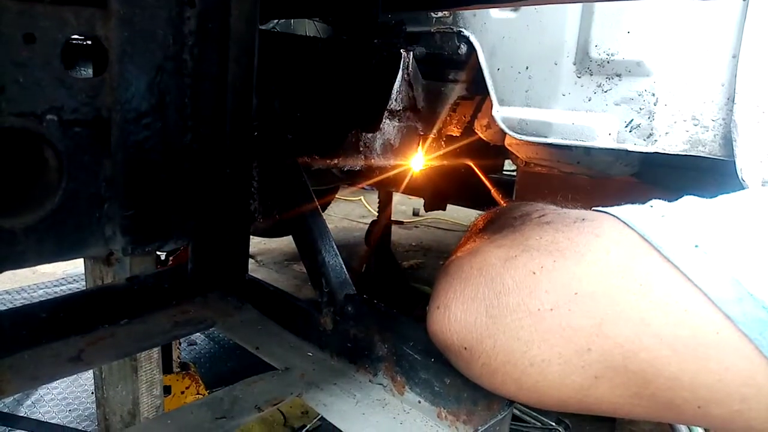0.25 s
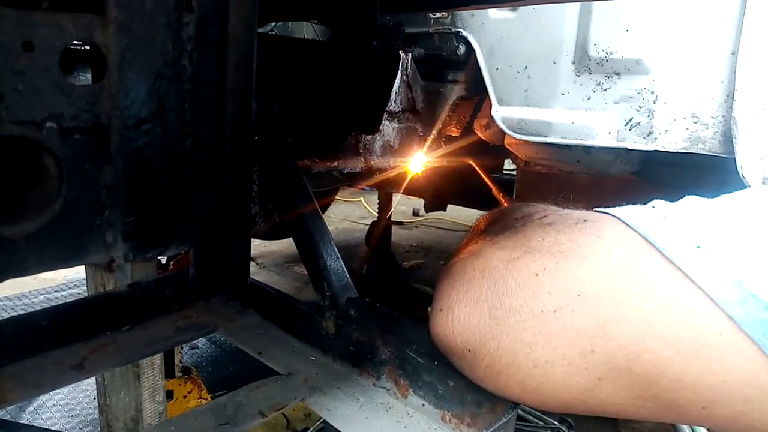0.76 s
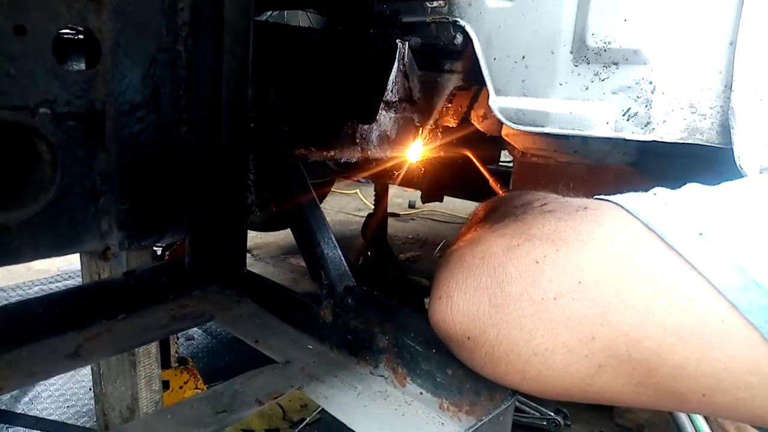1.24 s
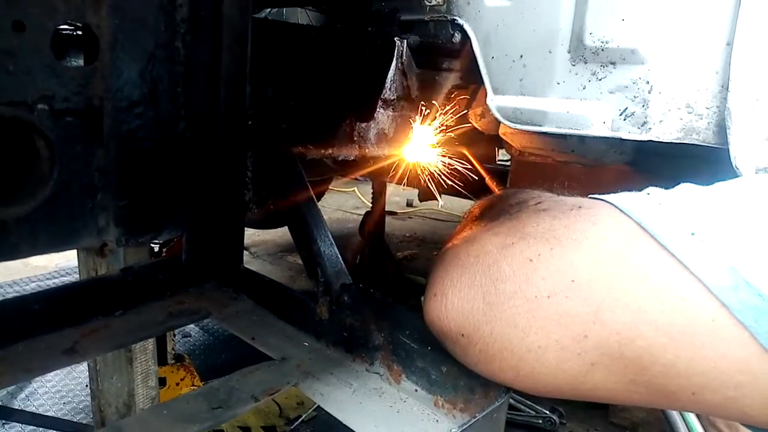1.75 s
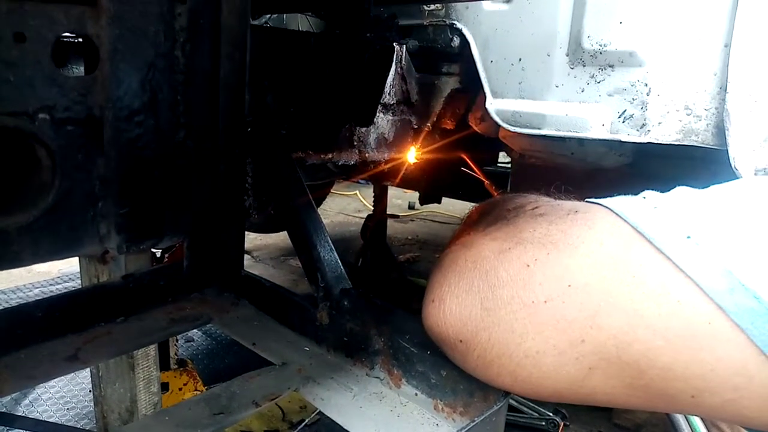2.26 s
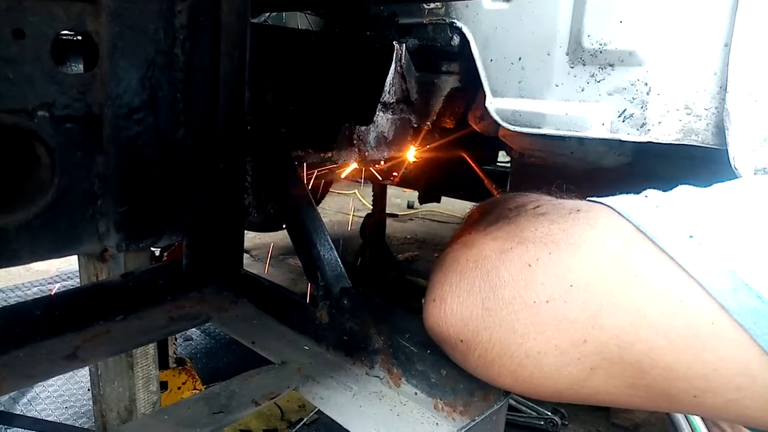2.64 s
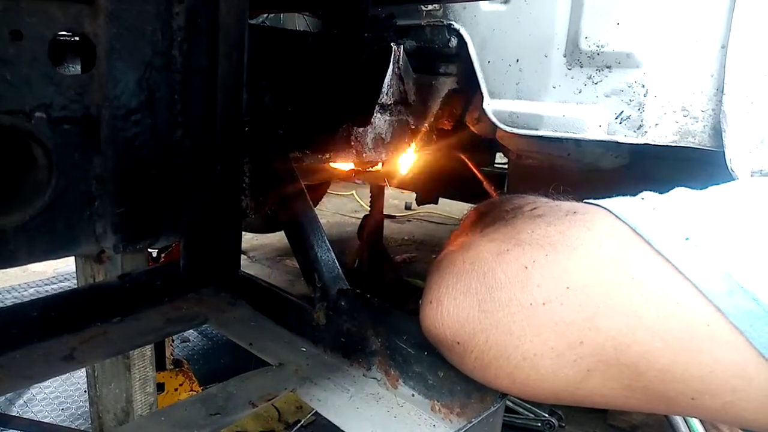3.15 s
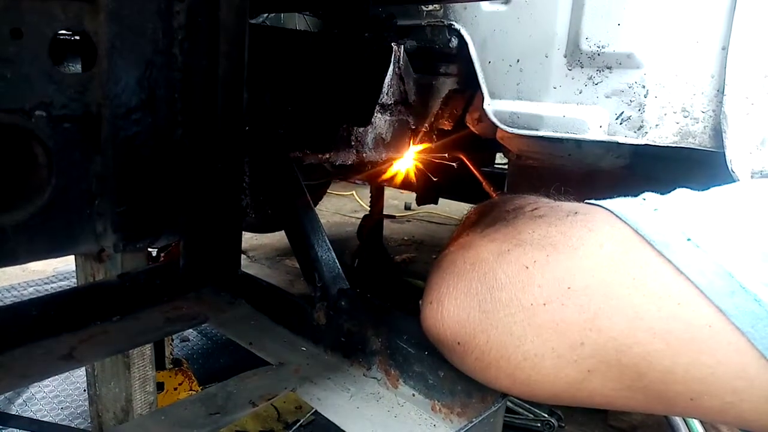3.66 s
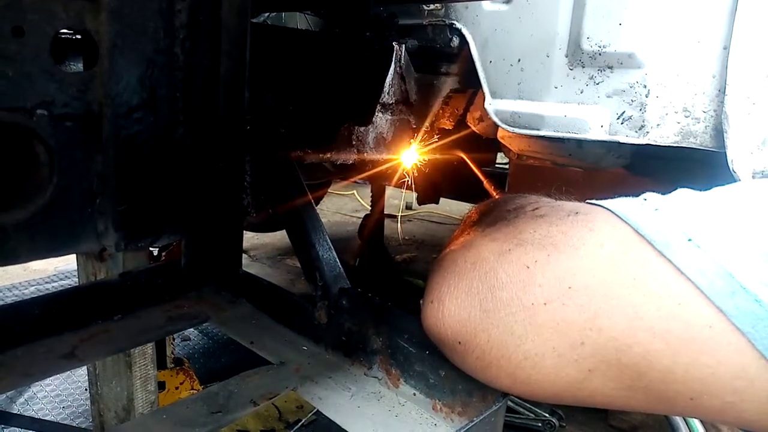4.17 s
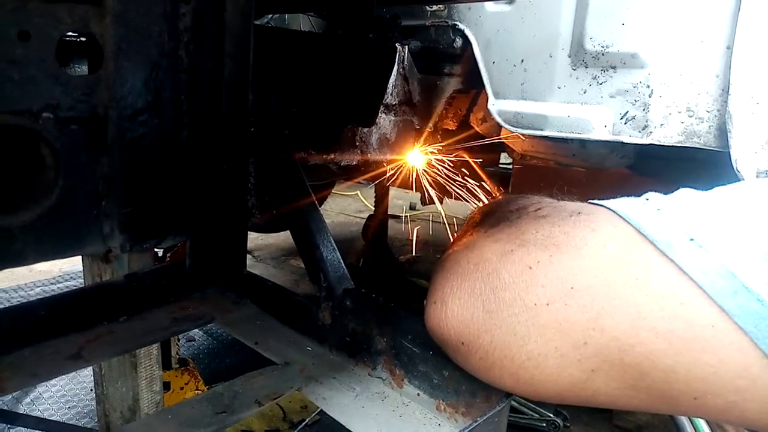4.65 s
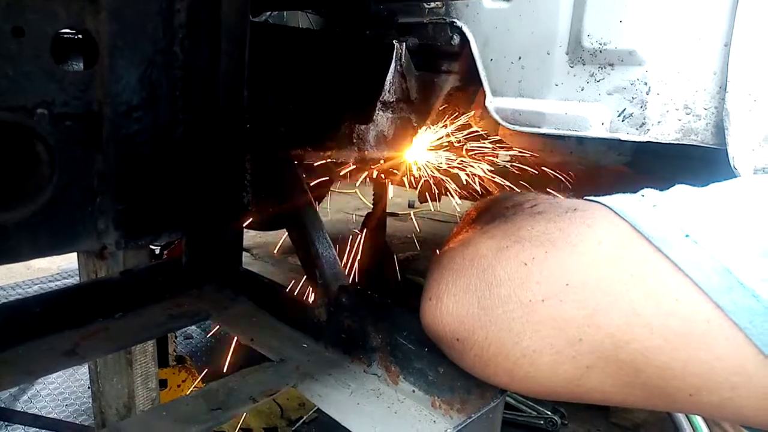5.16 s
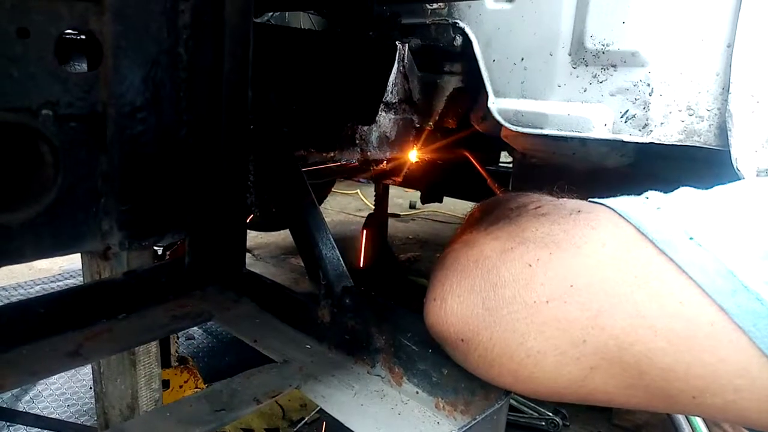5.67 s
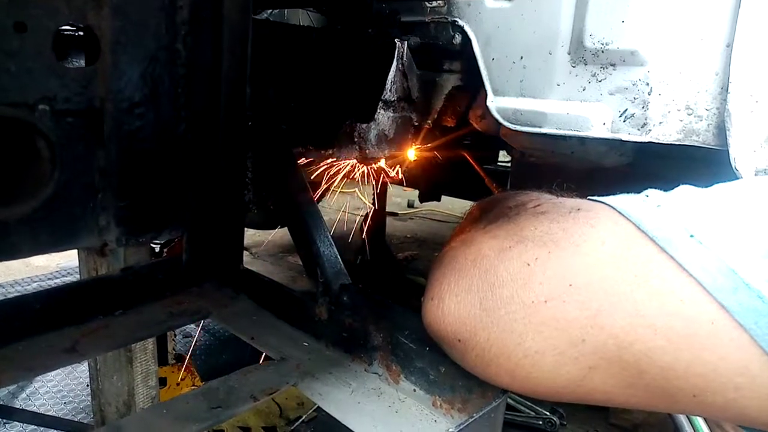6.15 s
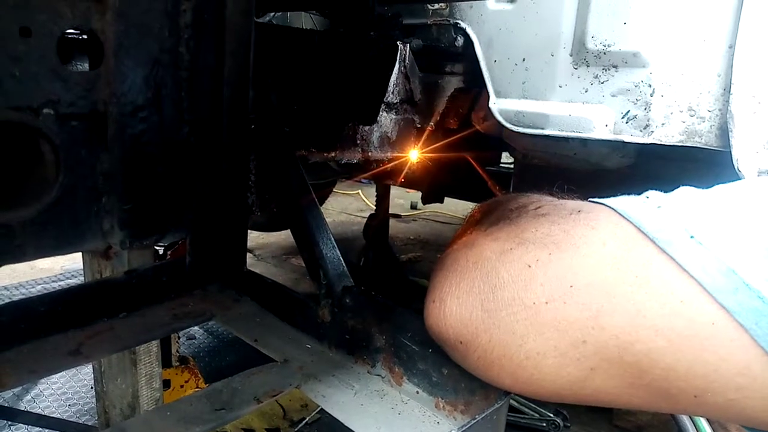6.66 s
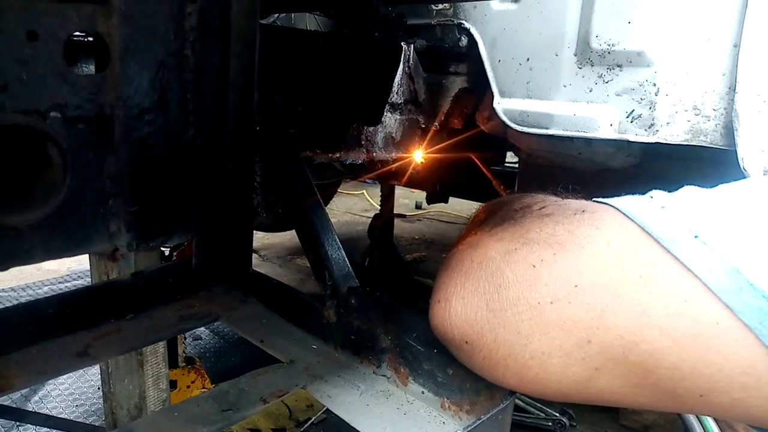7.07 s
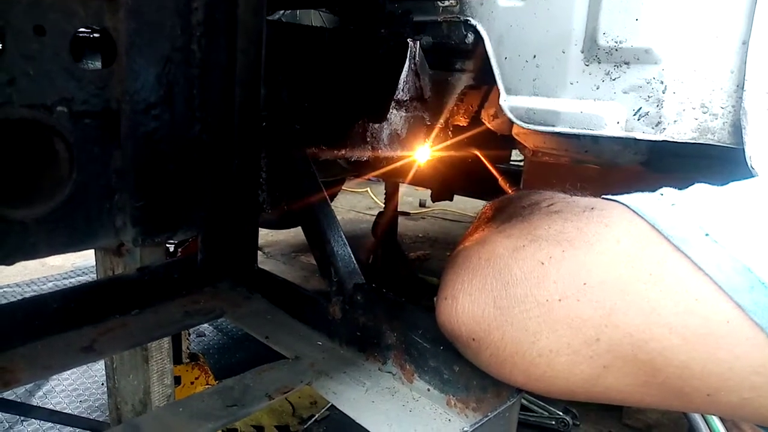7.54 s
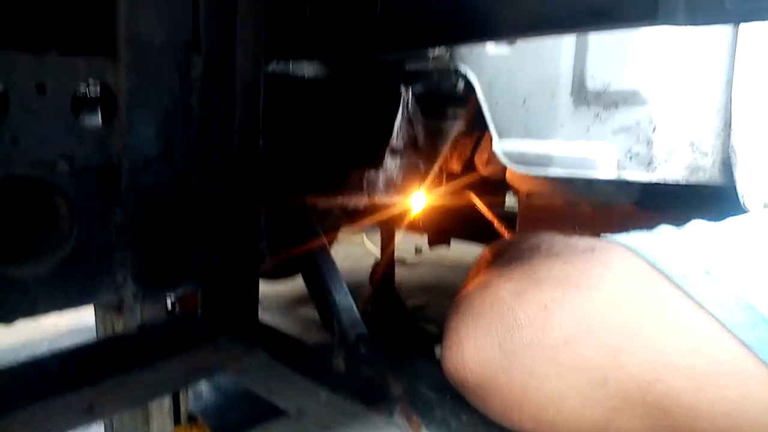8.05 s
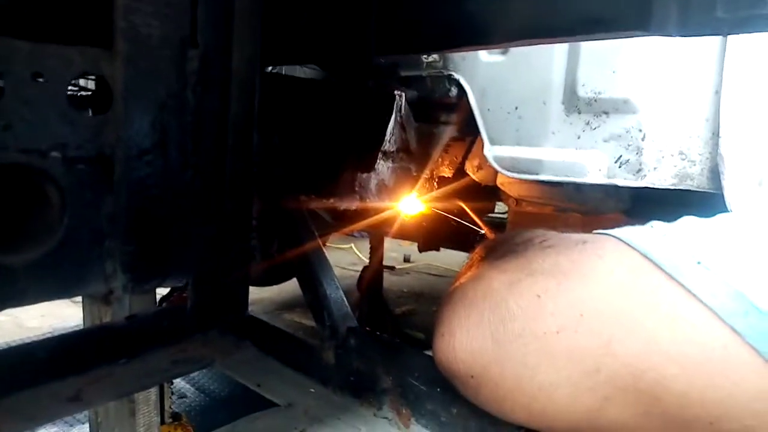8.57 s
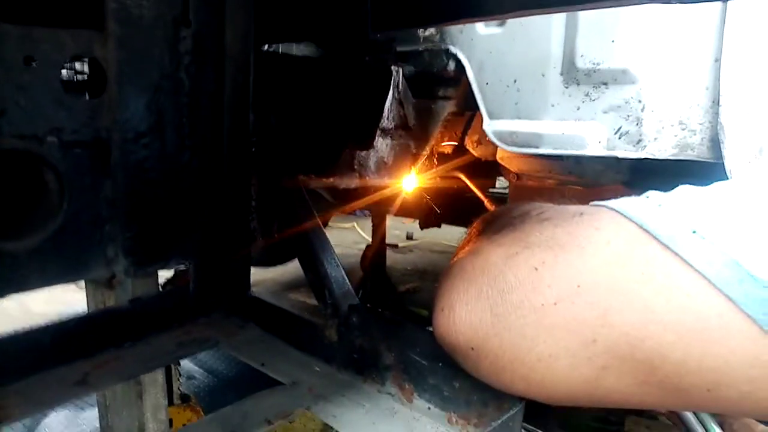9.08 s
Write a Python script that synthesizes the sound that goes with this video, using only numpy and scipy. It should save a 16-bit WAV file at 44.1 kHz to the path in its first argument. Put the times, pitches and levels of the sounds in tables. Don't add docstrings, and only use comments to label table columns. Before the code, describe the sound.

A hand-held stereo microphone near arc welding in a workshop. The arc fries and crackles loudly with sharp pops, breaks up, whistles faintly on restarting, nearly dies, then sizzles steadily with small gaps. It weakens into airy sputters before flaring hard again and stopping. The metal frame adds a tight, ringing colour, puffs of air thud at the microphone, and a low shop rumble fills the gaps.

```python
import sys
import numpy as np
from scipy import signal
from scipy.fft import rfft, irfft, next_fast_len
from scipy.io import wavfile
from scipy.ndimage import uniform_filter1d

SR = 44100
rng = np.random.default_rng(int(sys.argv[2]) if len(sys.argv) > 2 else 0)


def voltage_ratio(level):
    return 10 ** (np.asarray(level, float) / 20)


def transcribe(u):
    v = np.clip(np.atleast_2d(u).T, -1, 1)
    q = np.round(v * 32767).astype(np.int16)
    wavfile.write(sys.argv[1], SR, q)


N = 410571

PORT_LAG = 38
PADDED = next_fast_len(N + SR // 2)
HZ = np.maximum(np.arange(PADDED // 2 + 1) * SR / PADDED, 1)


def rms_one(x):
    return x / np.sqrt(np.mean(np.abs(x) ** 2) + 1e-20)


def in_time(rows):
    s, *columns = np.transpose(rows)
    return [np.interp(np.arange(N) / SR, s, column) for column in columns]


def over_hz(points):
    hz, value = np.transpose(points)
    return np.interp(np.log(HZ), np.log(hz), value)


def drift(rate_hz):
    r = np.exp(-2 * np.pi * rate_hz / SR)
    noise = rng.standard_normal(N + SR)
    return rms_one(signal.lfilter([1], [1, -2 * r, r * r], noise)[SR:])


def below(edge_hz):
    return 1 / (1 + (HZ / edge_hz) ** 10)


def peaks_db(modes):
    return sum(db / (1 + (2 * (HZ - hz) / width) ** 2) for hz, width, db in modes)


def held(t, start, end, rise_db_per_s, fall_db_per_s):
    attack = -rise_db_per_s * np.maximum(start - t, 0)
    return attack - fall_db_per_s * np.maximum(t - end, 0)


def burning():
    # strike in seconds, break in seconds, hiss at strike in dB,
    # hiss at break in dB, sizzle relative to hiss in dB.
    burns = [(0.0, 0.603, -28.5, -25, 3.5), (0.645, 0.737, -41, -62, -6), (0.91, 1.082, -62, -41, -3),
             (1.107, 1.71, -37.5, -35, 2), (1.705, 1.859, -30, -23.5, -1), (1.96, 2.223, -44, -41.5, -2),
             (2.416, 2.658, -40, -36, -4.5), (2.71, 2.773, -28, -31.5, 1), (2.821, 3.055, -42.5, -55, -11),
             (3.359, 3.466, -35.5, -48, -8), (3.712, 3.82, -47, -34, 0), (3.848, 4.494, -32, -31.5, 0.5),
             (4.508, 4.876, -28, -28, -1.5), (4.88, 5.624, -37.5, -36, 0), (5.755, 6.008, -39, -40, 0.5),
             (6.072, 6.282, -32.5, -57, 1.5), (6.682, 6.843, -53, -51, -4), (7.28, 7.495, -48, -39, -4),
             (7.507, 7.74, -39, -40.5, -3.5), (7.749, 7.985, -56, -46.5, 1.5),
             (8.037, 8.216, -38.5, -49.5, -7), (8.273, 8.396, -59, -39.5, -6),
             (8.416, 8.604, -39.5, -44.5, -10), (8.656, 9.311, -29.5, -32, 1)]
    # middle in seconds, hold in seconds, hiss in dB, sizzle relative to hiss in dB, roar in dB.
    flares = [(0.07, 0.016, -41, 10, -68), (0.196, 0.018, -25, -3, -47), (0.417, .01, -24.5, -10, -35.5),
              (0.578, 0.022, -19, -17, -37), (1.758, 0.022, -24.5, -6, -42.5),
              (1.888, 0.013, -28.5, -11, -29.5), (2.276, 0.042, -22.5, -9, -32),
              (2.378, 0.054, -26, -7, -32), (2.521, 0.053, -32, -6, -43.5), (3.147, 0.058, -46.5, -3, -53),
              (3.626, 0.017, -40, -15, -50), (3.834, 0.016, -33.5, 2, -59), (4.178, 0.084, -31.5, -9, -46),
              (4.793, .01, -25.5, 2, -60), (4.852, 0.012, -25, -4, -56), (5.166, 0.059, -31, -12, -43.5),
              (5.673, 0.075, -28, -3, -42.5), (5.82, 0.027, -38, -1, -52), (6.034, 0.038, -28.5, -3, -42.5),
              (6.861, 0.0073, -22, 0, -40.5), (8.61, .01, -32, 0, -50), (9.062, 0.016, -26, -3.5, -51),
              (9.149, 0.074, -24, -22, -41.5), (9.264, 0.053, -25, -9, -37.5),
              (0.7, 0.032, -58, -4, -48), (2.11, 0.067, -50, -9, -42.5), (2.611, 0.061, -39, -5, -40),
                (3.42, 0.045, -39.5, -20, -45), (4.5, 0.46, -52, -6, -44), (7.35, 0.059, -50, 4, -59.5),
                (7.83, 0.018, -48, 4, -65), (7.93, 0.018, -46, -1, -58), (8.19, 0.035, -57, 13, -64),
                (4.88, .01, -45, -5, -47), (7.87, 0.015, -67, -4, -78), (8.05, 0.043, -47, -10, -47),
                (8.33, .02, -56, -1, -60), (8.53, 0.045, -53, -5, -45), (1.65, .03, -54, 0, -48),
                (8.41, .04, -55, -7, -46.5), (8.76, 0.018, -32, -12, -43), (8.97, 0.028, -30.5, 1.5, -43.5)]
    strike_db_per_s, break_db_per_s = 500, 900
    swell_db_per_s, sink_db_per_s = 291, 499
    glow_db, glow_sizzle_db = -57, -4
    middling_db = -35
    roar_db_at_middling, roar_follows = -46, 0.29
    dark_db_at_middling, dark_follows = -1, -0.062

    t = np.arange(0, N / SR + .002, .001)
    hiss = voltage_ratio(2 * glow_db)
    sizzle = voltage_ratio(2 * (glow_db + glow_sizzle_db))
    for start, end, from_db, to_db, sizzle_db in burns:
        level_db = np.interp(t, [start, end], [from_db, to_db])
        power = voltage_ratio(2 * (level_db + held(t, start, end, strike_db_per_s, break_db_per_s)))
        hiss = hiss + power
        sizzle = sizzle + power * voltage_ratio(2 * sizzle_db)
    steady_db = 10 * np.log10(hiss) - middling_db

    roar = voltage_ratio(2 * (roar_db_at_middling + roar_follows * steady_db))
    for s, hold, hiss_db, sizzle_db, roar_db in flares:
        power = voltage_ratio(2 * held(t, s - hold / 2, s + hold / 2, swell_db_per_s, sink_db_per_s))
        hiss = hiss + power * voltage_ratio(2 * hiss_db)
        sizzle = sizzle + power * voltage_ratio(2 * (hiss_db + sizzle_db))
        roar = roar + power * voltage_ratio(2 * roar_db)
    dark_db = dark_db_at_middling + dark_follows * (10 * np.log10(hiss) - middling_db)
    return in_time(np.transpose([t, np.sqrt(hiss), np.sqrt(sizzle / hiss), np.sqrt(roar), dark_db]))


def spits():
    # start in seconds, peak in dB, decay by 60 dB in seconds, share of roar in dB.
    spit_rows = [(1.0884, -23.5, 0.19, -8), (1.717, -2.5, 0.082, -13), (1.867, 0, 0.1, -16.5),
                 (2.235, -8, 0.03, 4), (2.279, -14, 0.075, -16), (2.3414, -20, 0.079, 1),
                 (2.5132, -26, 0.064, -17), (2.696, -3, 0.074, -14), (2.7174, -16, 0.052, -5),
                 (3.7314, -25, .04, -17), (4.96, -37, 0.013, -22), (5.817, -12, 0.032, -21),
                 (7.645, -22, 0.04, -18), (8.5764, -22, .05, -15), (9.0334, -5, 0.037, -14),
                 (5.03, -22, 0.049, -28), (3.6357, -12, 0.039, -21), (4.766, -13, 0.018, -3),
                 (4.836, -8, .04, -19), (5.6273, -14, 0.063, -29), (6.829, -31, 0.14, 5),
                 (7.051, -22, 0.018, -30), (8.0112, -32, 0.097, 2), (8.6466, -6, 0.035, -15),
                 (8.698, -13, 0.036, -16), (8.748, -15, 0.047, -24)]
    t = np.arange(SR // 4) / SR
    hiss, roar = np.zeros(N + SR), np.zeros(N + SR)
    for s, db, t60, roar_db in spit_rows:
        attack = np.clip(t / .0018, 0, 1)
        burst = attack * voltage_ratio(db - 15 - 60 * t / t60)
        near = slice(round(s * SR), round(s * SR) + len(t))
        hiss[near] += burst
        roar[near] += burst * voltage_ratio(roar_db)
    return hiss[:N], roar[:N]


def frame_path(colour, modes, lag, near_t60, near_db, far_t60, far_db):
    t = np.arange(SR // 3) / SR
    echoes = np.zeros(len(t))
    for t60, db in ((near_t60, near_db), (far_t60, far_db)):
        decay = voltage_ratio(-60 * t / t60) / np.sqrt(t60 * SR / 14)
        echoes += voltage_ratio(db) * rng.standard_normal(len(t)) * decay
    echoes[0] = 1
    path = rfft(echoes, PADDED)
    path /= np.sqrt(uniform_filter1d(np.abs(path) ** 2, size=1400))
    modes = [(hz, width, db * (rng.uniform(.2, 1.6) if hz > 3000 else 1)) for hz, width, db in modes]
    delay = np.exp(-2j * np.pi * HZ * lag / SR)
    return path * voltage_ratio(over_hz(colour) + peaks_db(modes)) * delay


def arc(burn, sizzle_share, roar, dark_db):
    # time in seconds, left-right difference of hiss in dB, of sizzle in dB.
    aim = [(0.0, 2, 0), (0.5, 3, -3), (1.53, -0.7, -2), (1.94, 3, 0), (2.72, 1.5, 0.5), (3.06, 4, -1.5),
           (3.37, 1, 3), (3.8, 3, -7.5), (4.2, 1.5, -1.5), (5.75, 3, -0.5), (7.05, 4, -2.5),
           (7.83, 2.5, -2.5), (8.92, 1.5, -13), (9.31, 2.5, -11.5)]
    # frequency in Hz, density in dB per Hz.
    left_colour = [(300, -12.0), (600, -6.3), (1300, -7.5), (2200, -6.7), (3500, -4.6), (4900, -0.3),
                   (6000, 5.4), (7200, 5.8), (8800, 2.0), (10000, -5.8), (11800, -12.6), (13600, -16.5),
                   (14800, -9.9), (15500, -10.9)]
    right_colour = [(300, -9.5), (600, -9.0), (1300, -7.6), (2200, -7.0), (3500, -5.9), (4900, -2.0),
                    (6000, 2.0), (7200, 0.6), (8800, 2.3), (10000, -1.8), (11800, -7.3), (13600, -11.1),
                    (14800, -1.5), (15500, -2.1)]
    # frequency in Hz, width in Hz, height in dB.
    left_modes = [(480, 200, -8), (1240, 110, -6), (680, 50, 5), (1012, 50, 8), (830, 60, -6),
                  (1145, 50, 6), (1500, 60, 4), (1840, 60, 2), (1950, 200, -3), (1640, 60, 4),
                  (4457, 90, 2), (5310, 40, 4), (5775, 70, 3), (6400, 45, 7), (6725, 60, 8), (7070, 70, 4),
                  (7600, 120, 3), (8620, 150, 4)]
    right_modes = [(480, 200, -8), (1180, 130, -5), (680, 50, 5), (930, 50, 9), (1012, 50, 9),
                   (1300, 50, 4), (1500, 50, 4), (1650, 90, 5), (1830, 50, 4), (1980, 150, -3),
                   (2150, 50, 4), (2650, 90, 5), (3875, 90, 4), (6300, 200, 3), (9200, 300, 4)]
    # frequency in Hz, width in Hz, height in dB.
    left_port = [(493, 260, 4), (900, 200, 2.5), (1270, 72, 6), (1850, 120, 7), (3220, 450, 5),
                 (4170, 230, 6), (5100, 200, 1.5), (7000, 490, 1), (10900, 280, 2.5), (13500, 990, -16)]
    right_port = [(920, 130, 2.5), (1180, 130, 5), (1560, 300, 0.5), (3010, 650, 7), (4860, 260, -0.5),
                  (5060, 210, -0.5), (8100, 400, -4), (9540, 400, 2.5), (11500, 900, -1.5),
                  (14900, 800, 0.5)]

    hiss_pan, sizzle_pan = in_time(aim)
    spit, spit_roar = spits()
    lumps_db = 2.0 * drift(350.0) + .5 * drift(45.0)
    spot = np.pi / 4 + .55 * drift(1.2)
    shares = [.87 * np.cos(spot), .87 * np.sin(spot), np.full(N, .5)]
    gas = rng.standard_normal((3, N)) * rms_one(voltage_ratio(lumps_db)) * shares

    hiss = burn * voltage_ratio(2.0) + spit
    drives = [roar * voltage_ratio(0.5) + spit_roar, hiss * voltage_ratio(dark_db - 7.5), hiss * voltage_ratio(-5.0), hiss * sizzle_share]
    pans = [0, hiss_pan, hiss_pan, sizzle_pan]
    under = [below(450), below(2520), below(5270), below(7650), 1]

    paths = []
    for colour, modes, lag in ((left_colour, left_modes, 0), (right_colour, right_modes, PORT_LAG)):
        paths.append(np.array([
            frame_path(colour, modes, lag, near_t60=.025, near_db=1.5, far_t60=.2, far_db=-5.0)
            for _ in gas]))
    port_colours = [voltage_ratio(peaks_db(left_port)), voltage_ratio(peaks_db(right_port))]
    out = np.zeros((2, N))
    for drive, low, high, pan_db in zip(drives, under, under[1:], pans):
        driven = rfft(gas * drive, PADDED)
        for port, path in enumerate(paths):
            heard = np.sum(driven * rms_one(path * (high - low)), axis=0) * port_colours[port]
            out[port] += irfft(heard, PADDED)[:N] * voltage_ratio(pan_db * (.5 - port))
    return out


def pockets(x):
    # (frequency in Hz, width in Hz, left in dB, right in dB), then the spans faced,
    # each from and to in seconds.
    pocket_rows = [
        ((8600, 250, -9, -25), [(0.0, 0.75), (1.1, 1.8)]),
        ((6744, 57, -1, -18), [(4.08, 5.5)]),
        ((5748, 700, -2, -4.5), [(8.55, 9.6)]),
        ((14900, 1130, 8.6, 5.1), [(7.08, 8.55)]),
        ((11800, 2500, -4, -4.5), [(7.08, 8.5)]),
        ((5550, 250, 2, -8), [(7.55, 7.1), (8.28, 8.6)]),
        ((1000, 65, 3.5, 5.4), [(1.85, 1.96), (2.08, 2.34), (2.33, 2.4), (2.55, 2.78), (5.12, 5.44), (8.02, 8.14), (9.12, 9.2), (9.22, 8.7)]),
        ((900, 70, 9, 5.9), [(.62, 0.72), (2.08, 2.25), (2.33, 1.9), (2.51, 2.5), (5.45, 2.9), (4.5, 4.3)]),
        ((1146, 60, -3, -19), [(2.22, 2.3), (4.15, 5.4), (5.12, 3.9), (9.1, 10.2)]),
    ]
    out, t = x.copy(), np.arange(N) / SR
    for (hz, width, left_db, right_db), spans in pocket_rows:
        corners = [s for start, end in sorted(spans) for s in (start, start + .028, end - .028, end)]
        facing = np.interp(t, corners, [0, 1, 1, 0] * len(spans))
        r = np.exp(-np.pi * width / SR)
        poles = [1, -2 * r * np.cos(2 * np.pi * hz / SR), r * r]
        rung = signal.lfilter([(1 - r * r) / 2, 0, (r * r - 1) / 2], poles, x)
        out += rung * facing * voltage_ratio(np.array([[left_db], [right_db]]))
    return out


def whistles():
    # time in seconds, frequency in Hz, level in dB.
    whistle_rows = [
        [(1.96, 1330, -70), (2.0, 1340, -42), (2.035, 1370, -41), (2.055, 1480, -47), (2.08, 1690, -42),
         (2.11, 1770, -46), (2.145, 1750, -48), (2.175, 1680, -40), (2.21, 1660, -55), (2.25, 1650, -75)],
        [(5.84, 870, -65), (5.89, 865, -46), (6.05, 865, -44), (6.13, 875, -47), (6.17, 860, -53),
         (6.23, 825, -46), (6.29, 830, -70)],
        [(6.96, 920, -70), (7.02, 900, -48), (7.05, 880, -51), (7.1, 880, -70)],
        [(7.12, 1020, -70), (7.17, 1000, -50), (7.26, 910, -53), (7.4, 940, -53), (7.45, 950, -70)],
        [(7.55, 1800, -70), (7.58, 1830, -47), (7.64, 1810, -48), (7.69, 1800, -70)],
        [(8.12, 1320, -70), (8.16, 1450, -48), (8.19, 1460, -70)],
    ]
    lags = [26, 42, 42, 42, 26, 26]
    out = np.zeros((2, N))
    for rows, lag in zip(whistle_rows, lags):
        hz, db = in_time(rows)
        phase = 2 * np.pi * np.cumsum(hz * (1 + .006 * drift(40.0))) / SR
        tone = voltage_ratio(db - 2 + 2.5 * drift(20.0)) * np.sin(phase)
        out += [tone, np.roll(tone, lag)]
    return out


def puffs(rows):
    out, t = np.zeros(N + SR), np.arange(-400, 400) / SR
    for s, db, hz in rows:
        roundness = np.clip(2.6 - abs(hz) / 700, 1, 2)
        lead = np.where(t < 0, (3 - roundness) ** 2, 1)
        bump = np.exp(-2 * np.abs(hz * t * lead) ** roundness)
        out[round(s * SR) - 400:][:len(t)] += np.sign(hz) * voltage_ratio(db + 3) * bump
    high_pass = signal.butter(1, 70, "high", fs=SR, output="sos")
    vent, damping = 2 * np.pi * 95, .4
    vent_filter = signal.bilinear([1, 0, 0], [1, 2 * damping * vent, vent ** 2], SR)
    return signal.lfilter(*vent_filter, signal.sosfilt(high_pass, out[:N]))


def gusts():
    # middle in seconds, length in seconds, left in dB, right in dB, top frequency in Hz.
    gust_rows = [(0.251, 0.85, -46, -55, 450), (0.41, 0.029, -52, -28, 150),
                 (1.886, 0.062, -37, -35.5, 352), (2.403, 0.14, -57, -41.5, 323),
                 (4.768, 0.049, -43, -40, 417), (0.521, 0.13, -41.5, -49, 600),
                 (1.718, 0.072, -47, -46, 400), (7.954, 0.087, -38, -33, 173),
                 (8.801, 0.18, -48, -43.5, 700), (8.613, 0.051, -40, -53, 200),
                 (8.676, 0.074, -57, -30.5, 2530), (9.104, 0.97, -51, -53, 500)]
    out, t = np.zeros((2, N)), np.arange(N) / SR
    for s, length, left_db, right_db, top_hz in gust_rows:
        near = slice(round((s - .2) * SR), round((s + .2) * SR))
        band = signal.butter(2, [65, top_hz], "band", fs=SR, output="sos")
        air = signal.sosfilt(band, rng.standard_normal((2, len(t[near]))))
        swell = np.exp(-(2 * (t[near] - s) / length) ** 4)
        out[:, near] += rms_one(air) * swell * voltage_ratio(np.array([[left_db], [right_db]]))
    return out


def shop():
    # frequency in Hz, density in dB per Hz.
    spectrum = [(18, -54), (30, -25), (76, 1), (122, -3), (472, -4), (928, -9.5), (1240, -15.5),
                (2250, -18), (3980, -20.5), (6700, -22), (9150, -25.5), (13500, -42), (15000, -45)]
    # frequency in Hz, left-right likeness from 0 to 1.
    likeness = [(150, 0.7), (450, 0.84), (1000, 0.063), (2500, 0.024)]
    # frequency in Hz, width in Hz, height in dB.
    room_modes = [(70.8, 6.5, 9.5), (111.2, 42, 10.5), (145.7, 20, 11), (236.8, 4.9, 4.5), (103, 6.5, 5),
                  (228.4, 12.6, 4), (914, 22, 8), (988, 30, 14), (1706, 43, 11), (1220, 150, -6)]
    alike = np.clip(over_hz(likeness), 0, 1)
    noise = rfft(rng.standard_normal((2, PADDED)))
    common, own = noise * voltage_ratio(over_hz(spectrum) + peaks_db(room_modes))
    common = np.sqrt(1 + alike) * common
    own = np.sqrt(1 - alike) * own
    left = irfft(common + own, PADDED)[:N]
    right = irfft(common - own, PADDED)[:N]
    level_db = -47 + 3.5 + .5 * drift(2.8)
    return voltage_ratio(level_db) * rms_one(np.array([left * voltage_ratio(-1.0), np.roll(right, PORT_LAG)]))


def scene():
    # time in seconds, peak in dB, sharpness in Hz (below zero the air pulls).
    left_puffs = [(.598, -19, 1500), (.6035, -18.5, 1100), (7.818, -32, -250), (7.935, -46, 400),
                  (7.968, -38, -300), (7.974, -31, -300), (7.994, -38, -250), (8.6, -39, -300),
                  (8.616, -26, -300), (8.623, -25, -300), (8.629, -26, -250)]
    right_puffs = [(.3976, -14, 4200), (.6045, -16, -3000), (8.6555, -20, 3000), (8.7105, -21, -2500),
                   (9.041, -31, 700), (9.302, -25, 2000), (9.3026, -21, -1600), (1.755, -33, 500),
                   (.3971, -7, 1100), (.4012, -17, -900), (.4227, -23, -1200), (7.9, -28, 400),
                   (7.91, -29, 250), (7.928, -26, 400), (7.932, -26, 450), (7.941, -23, 250),
                   (7.969, -21, 380), (7.976, -27, 400), (7.989, -24, -300), (8.65, -16, 2500),
                   (8.6535, -16, -2500), (8.661, -16, -1500), (8.668, -14, 2000), (8.67, -11, -700),
                   (8.6805, -17, 2000), (8.7053, -15, -1200), (8.7082, -20, 1500)]
    drive = burning()
    excess_db = np.maximum(20 * np.log10(drive[0]) + 34.5, 0)
    duck_db = -.25 * uniform_filter1d(excess_db, size=4000)
    air = gusts() + np.array([puffs(left_puffs), puffs(right_puffs)])
    return pockets(arc(*drive)) + whistles() + air + shop() * voltage_ratio(duck_db)


def drop_bands(x):
    # from Hz, to Hz, then the spreads of chance needed when quiet, when middling, when loud.
    dropping = [(1850, 2300, 1.9, 1.7, 1.5), (2300, 3300, 2.4, 1.0, .6), (3300, 4300, 2.6, .8, .15),
                (4300, 5100, 3, 1.1, 1.0), (9300, 10500, 1.0, 1.4, 2.2), (10500, 13000, 0, .4, 1.15),
                (13000, 14300, -.4, -.1, .9), (14300, 15600, 1.5, 2.4, 3)]
    loudness_db = [-48, -40, -27]
    hz, _, cells = signal.stft(x, SR, nperseg=2048)
    power = np.sum(np.abs(cells[0, 150:]) ** 2, axis=0)
    level_db = 10 * np.log10(2 * power / 1.5 + 1e-12)

    def patches(frames, bins):
        noise = rng.standard_normal((len(hz), len(level_db)))
        return rms_one(uniform_filter1d(noise, size=frames))[np.arange(len(hz)) // bins]

    chance = .87 * patches(7, 7) + .5 * patches(2, 16)
    gain = np.ones(cells.shape[1:])
    for low_hz, high_hz, *rarity in dropping:
        band = (hz >= low_hz) & (hz < high_hz)
        dropped = chance[band] > np.interp(level_db, loudness_db, rarity)
        makeup = (1 - .8 * dropped.mean(axis=0)) ** -.25
        gain[band] = np.where(dropped, voltage_ratio(-45), makeup)
    return signal.istft(cells * gain, SR, nperseg=2048)[1][:, :N]


def roll_off(x):
    return signal.sosfilt(signal.butter(12, 15960, fs=SR, output="sos"), x)


def record(dry):
    rounded = .9 * np.tanh(dry / .9)
    low_pass = signal.ellip(12, .5, 70, 15520, fs=SR, output="sos")
    mix = drop_bands(signal.sosfilt(low_pass, rounded))
    return roll_off(mix)


dry = scene()
out = record(dry)
transcribe(out)
```